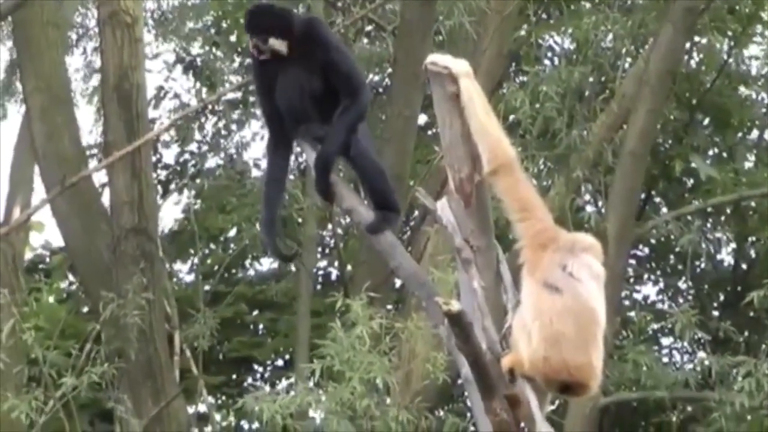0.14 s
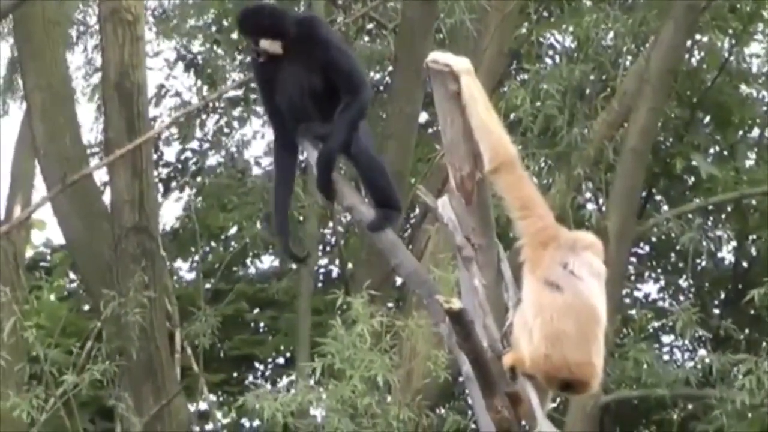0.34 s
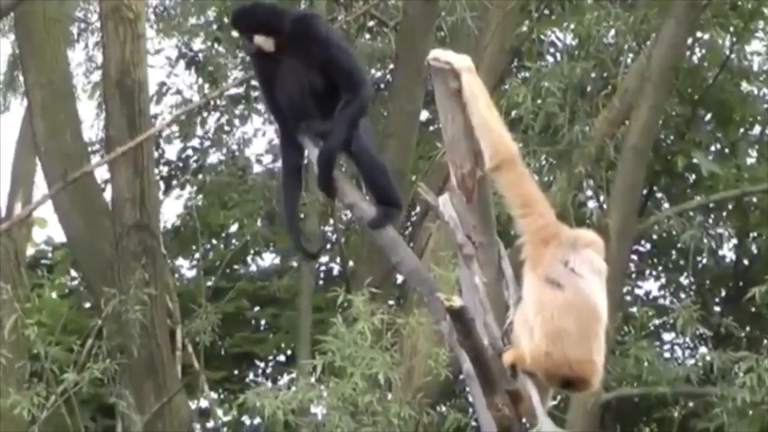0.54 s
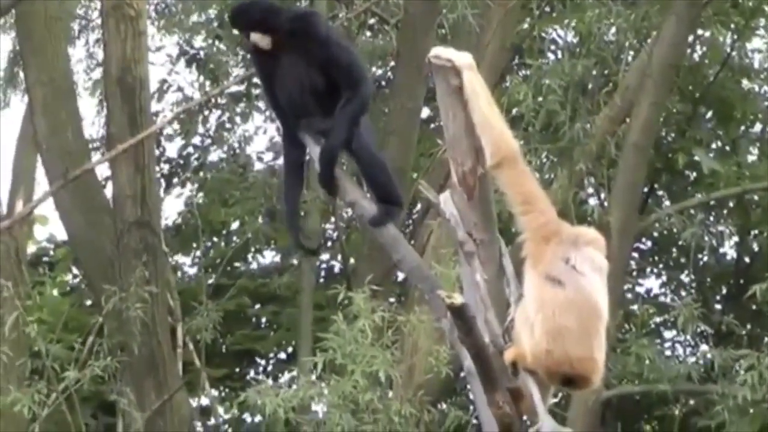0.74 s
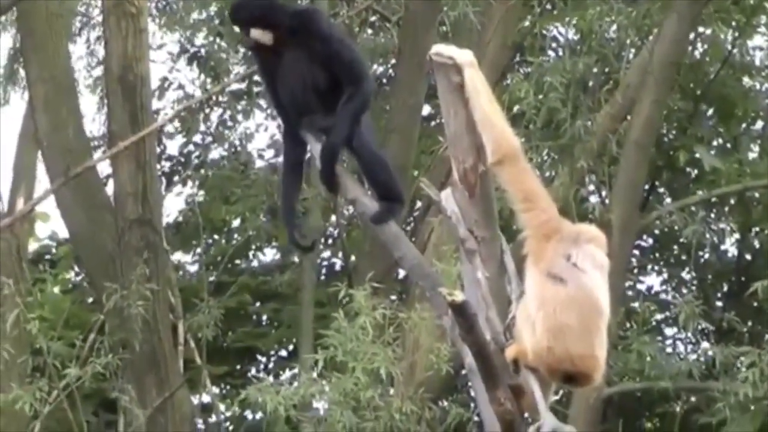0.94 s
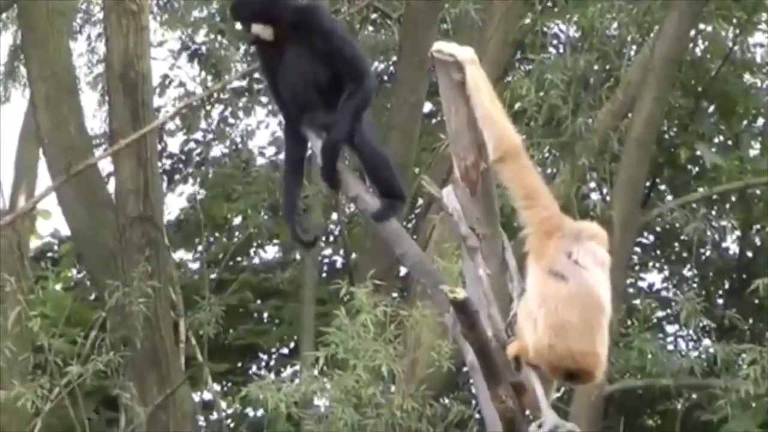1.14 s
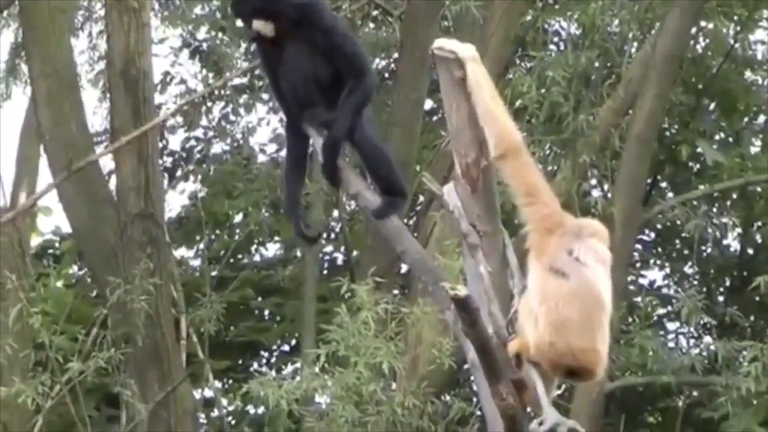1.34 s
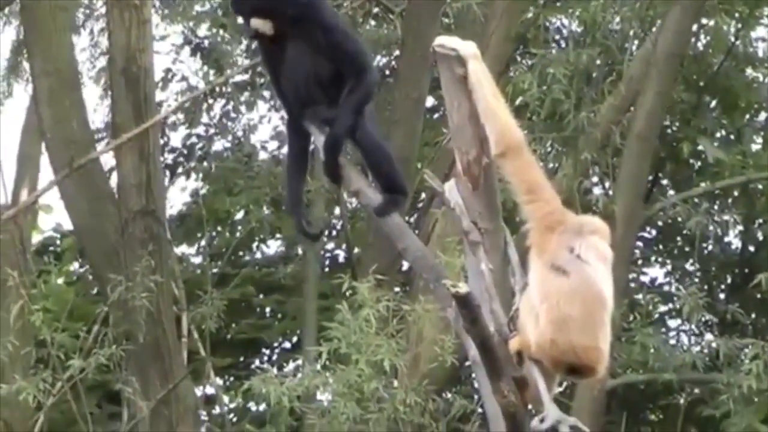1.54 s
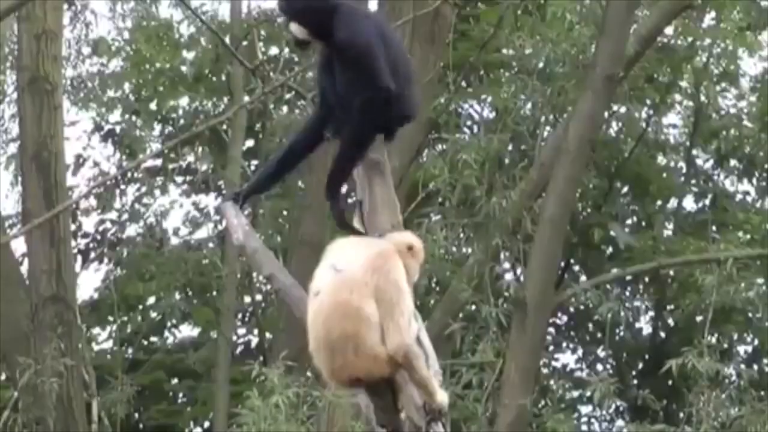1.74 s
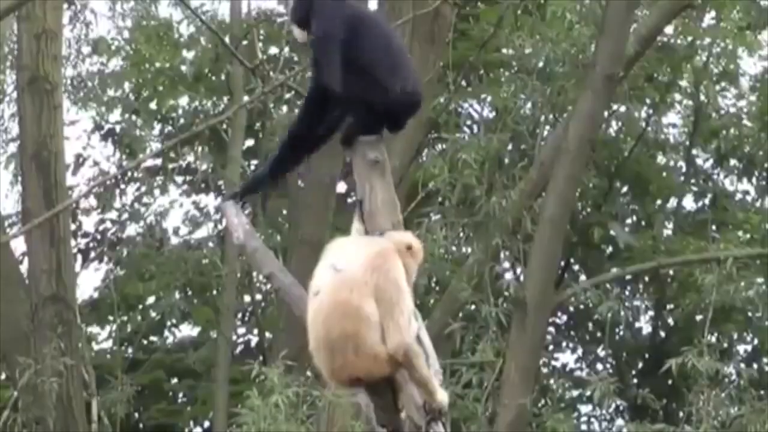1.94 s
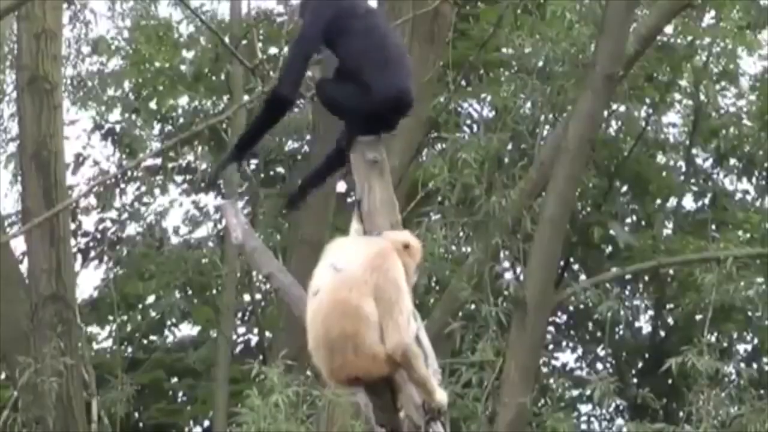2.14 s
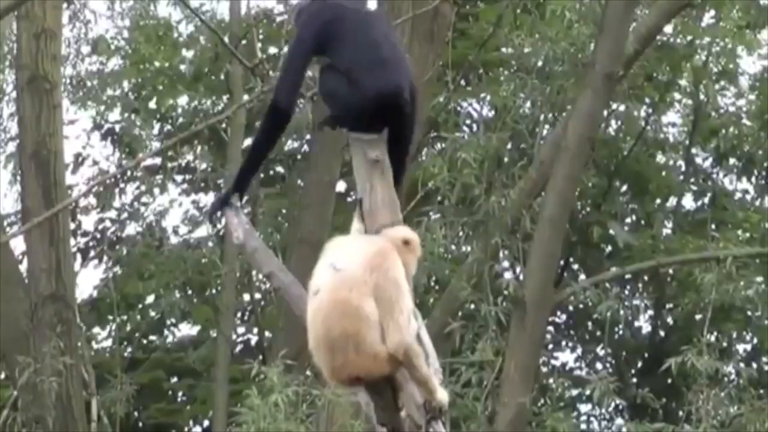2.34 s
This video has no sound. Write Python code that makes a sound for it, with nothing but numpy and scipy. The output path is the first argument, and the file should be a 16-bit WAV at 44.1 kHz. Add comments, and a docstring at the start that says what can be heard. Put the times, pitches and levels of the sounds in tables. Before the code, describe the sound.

A gibbon sings a clear whistle that slides upward and echoes off trees, then gives a short, softer hoot. Between them a small bird trills faintly. Leaves rustle over a low hum and distant rumble in the outdoor enclosure.

```python
"""In an outdoor enclosure, a gibbon on a dead tree sings a rising whistle, later a short hoot, and
two faint peeps; an earlier note still rings. Each note is one gliding pitch with overtones (multiples
of that pitch) shaped by the throat, and it echoes off trunks and walls. A small bird trills high up,
twigs snap and a motor hums. Behind them are faint tones, a bump of wind, and leaves rustling over
a distant rumble, all made from filtered noise."""
import sys
import numpy as np
from scipy import signal
from scipy.fft import rfft, irfft
from scipy.io import wavfile
from scipy.ndimage import uniform_filter1d

SR = 44100
rng = np.random.default_rng(int(sys.argv[2]) if len(sys.argv) > 2 else 0)


def inscribe(sig):
    """Save sig as 16-bit PCM at rate SR to the path in sys.argv[1].

    A 1-D sig is mono; a 2-D sig holds one channel per row.
    Samples are clipped to [-1, 1] before scaling.
    """
    pcm = np.round(np.clip(np.atleast_2d(sig).T, -1, 1) * 32767)
    wavfile.write(sys.argv[1], SR, pcm.astype(np.int16))


N = 110250

# one table per gibbon note: (time [s], pitch [Hz], base tone [dB], 2nd multiple [dB],
# 3rd and 4th multiples before the throat shapes them [dB])
GIBBON_NOTES = [
    [(-.34, 1473, -70, -75, -80), (-.30, 1474, -56, -55, -59), (-.075, 1497, -23.5, -68, -62),
     (-.06, 1632, -33.5, -72, -73), (-.02, 1676, -32.5, -82, -81), (-.005, 1710, -42, -79, -87)],
    [(.215, 1194, -56, -78, -80), (.228, 1223, -34, -40.5, -78), (.24, 1236, -27.5, -31.5, -54),
     (.253, 1278, -30.5, -40, -48), (.265, 1305, -36, -52, -52), (.29, 1314, -47.5, -39, -52),
     (.312, 1331, -36, -38, -45.5), (.35, 1320, -39.5, -44, -41.5), (.378, 1320, -35, -39, -43.5),
     (.405, 1330, -32.5, -35, -44), (.44, 1348, -32.5, -35, -46.5), (.468, 1359, -32, -39.5, -50.5),
     (.49, 1374, -25, -42.5, -36.5), (.505, 1393, -23.5, -42, -48.5), (.517, 1433, -27.5, -40, -46.5),
     (.528, 1420, -25, -43, -51.5), (.548, 1455, -24, -51.5, -63), (.565, 1513, -26.5, -48, -77),
     (.588, 1550, -40.5, -76, -55.5), (.612, 1592, -34, -66, -60.5), (.626, 1590, -45, -71, -74),
     (.634, 1588, -70, -95, -93)],
    [(1.996, 1582, -58, -86, -95), (2.006, 1550, -40.5, -66, -90), (2.024, 1540, -37.5, -56.5, -81),
     (2.044, 1566, -39.5, -65, -85), (2.055, 1583, -40.5, -85, -85), (2.061, 1710, -58, -76, -90),
     (2.069, 1725, -47, -80, -90), (2.078, 1740, -70, -90, -95)],
    [(1.835, 1070, -83, -95, -99), (1.845, 1084, -56, -79, -99), (1.858, 1070, -70, -85, -99),
     (1.868, 1090, -85, -95, -99)],
    [(.152, 1040, -77, -95, -99), (.162, 1064, -61, -79, -99), (.175, 1075, -61, -80, -99),
     (.185, 1090, -75, -95, -99)],
]
# for each note: (left over right [dB])
NOTE_PAN_DB = [13, 0, 4.5, -7, -9]
# for each note: (perch it is sung from [index])
NOTE_PERCH = [0, 0, 1, 1, 0]
# how the throat shapes the 3rd and 4th multiples: (frequency [Hz], gain [dB])
THROAT = [(3800, -27), (3970, -19), (4150, -14), (4600, -5), (5300, -2), (5600, -6.5), (6300, -6)]
# the whistle's top overtones come and go: (multiple, centre [s], half length [s], level [dB])
TOP_OVERTONES = [(5, 0.307, 0.021, -57.5), (5, 0.51, 0.041, -66), (6, 0.268, 0.018, -60.5),
                 (6, .315, .022, -56), (6, 0.423, .045, -57.5), (6, .53, .012, -63), (7, 0.28, .022, -62),
                 (7, 0.35, 0.025, -58.5), (7, .43, 0.028, -60), (8, 0.44, 0.033, -67)]
# echoes off nearby surfaces, one table per perch: (delay [s], base tone gain [dB], overtone gain [dB],
# base tone left over right [dB], base tone's extra delay on the right [ms])
NEAR_ECHOES = [
    [(.023, -10.5, -20.5, 3, -.2), (0.051, -22, -15, -2, 0.32), (.088, -16.5, -21, 4.5, .2),
     (0.139, -38, -23.5, -17, -.2), (.2, -29.5, -27, 12, 0.12)],
    [(.048, -13, 0, 0, .1), (.075, -26, -9, 2, -.1), (.1, -22, -17, 7, .1), (.16, -23, -24, 1, .1)],
]
# for each perch: (gain of the sound sent into the trees [dB])
PERCH_SCATTER_DB = [0.5, 1.5]
# bird phrases: (start [s], length [s], starting pitch [Hz], target pitch [Hz], level [dB])
BIRD_TRILLS = [(1.073, 0.15, 6970, 8400, -58.5), (1.24, 0.14, 7970, 8120, -56.5),
               (1.377, 0.11, 8320, 8240, -57)]
# snaps and knocks among the branches: (time [s], pitch [Hz], level [dB])
TWIG_SNAPS = [(.16, 483, -54), (0.206, 5640, -58), (1.1, 1960, -55.5), (1.914, 2258, -55.5),
              (2.298, 4600, -57), (2.335, 4900, -58), (2.475, 12000, -59)]
# the motor's tones: (multiple of its pitch, level before the drop [dB])
MOTOR_TONES = [(1, -56.5), (3, -61.5), (4, -63), (5, -74.5), (6, -71)]
# faint wavering tones: (pitch [Hz], band width [Hz], level [dB])
FAR_TONES = [(426, 37, -68.5), (553, 11, -68), (1956, 55, -69.5)]
# wind on the microphone: (centre [s], half length [s], level [dB])
WIND_GUSTS = [(0.44, 0.16, -59.5)]
# rumble and leaves: (frequency [Hz], level per hertz [dB], stereo width [dB], left over right [dB])
BACKGROUND_SPECTRUM = [(22, -107, 8, 3), (46.3, -83.5, -6, 3), (100, -87, -21, 5.5), (151, -85, -15, 3.5),
                       (254, -83, -13, 2.5), (460, -82, -18.5, 1), (703, -87.5, -12, 1), (938, -97, -2, 1),
                       (1580, -94.5, -5, -2), (2180, -91.5, -7, -0.5), (2690, -94, -7.5, 0),
                       (3700, -101.5, -4.5, -2), (4700, -94.5, -17, 1), (5490, -93.5, -37, -7),
                       (6390, -98.5, -33, 9.5), (6320, -102, -16, 3), (8930, -103, -33, -10.5),
                       (9600, -99, -46, 14.5), (10400, -102, -40, -14), (11600, -104, -33, 4),
                       (14700, -106, -24, -2)]

MOTOR_HZ, MOTOR_DROP_S = 70.15, 1.77


def gibbon_note(rows, t):
    """One gliding whistle, returned as its base tone and its overtones, which flutter in the throat."""
    flutter_db, flutter_hz = 2.5, 40
    rows = np.array(rows, float)
    on = (t > rows[0, 0]) & (t < rows[-1, 0])
    hz, base_db, second_db, upper_db = (np.interp(t[on], rows[:, 0], col) for col in rows[:, 1:].T)
    waver = 1 + .001 * walk(flutter_hz, len(hz))
    phase = 2 * np.pi * np.cumsum(hz * waver) / SR
    out = np.zeros((2, len(t)))
    out[0, on] = undb(base_db) * np.sin(phase)
    out[1, on] = undb(second_db) * np.sin(2 * phase)
    for k in (3, 4):
        throat_db = np.interp(k * hz, *np.array(THROAT).T)
        flutter = flutter_db * walk(1.47 * flutter_hz, len(hz))
        out[1, on] += undb(upper_db + throat_db + flutter) * np.sin(k * phase)
    for k, centre, half_length, db in TOP_OVERTONES:
        swell = np.exp(-((t[on] - centre) / half_length) ** 2)
        out[1, on] += undb(db + flutter_db * walk(flutter_hz, len(hz))) * swell * np.sin(k * phase)
    return np.sqrt(2) * out


def gibbon():
    """Each note arrives directly, bounced off nearby surfaces, and scattered through the trees."""
    lead_s = .4  # start early so that the earlier note still rings
    t = np.arange(N + int(lead_s * SR)) / SR - lead_s
    notes = [gibbon_note(rows, t) for rows in GIBBON_NOTES]
    base, overtones = sum(undb(PERCH_SCATTER_DB[perch]) * note for note, perch in zip(notes, NOTE_PERCH))
    out = undb(-12.5) * tree_scatter(base, fade_s=.74, width_db=-8.5)
    out += undb(-12) * tree_scatter(overtones, fade_s=.31, width_db=-12)
    for (base, overtones), note_pan_db, perch in zip(notes, NOTE_PAN_DB, NOTE_PERCH):
        out += pan(base + overtones, note_pan_db)
        for delay, base_db, overtone_db, pan_db, lag_ms in NEAR_ECHOES[perch]:
            base_echo = np.array([late(base, delay), late(base, delay + lag_ms / 1000)])
            out += pan(undb(base_db) * base_echo, pan_db) + undb(overtone_db) * late(overtones, delay)
    return out[:, -N:]


def tree_scatter(x, fade_s, width_db):
    """Many tiny echoes off the trees build up and fade; the farthest linger faintly."""
    t = np.arange(int(1.3 * SR)) / SR
    build_up = 1 - np.exp(-t / .023)
    near, far = undb(-60 * t / fade_s), undb(-16 - 60 * t / (2.6 * fade_s))
    shape = build_up * (near + far)
    mid, side = rng.standard_normal((2, len(t))) * shape / np.sqrt(np.sum(shape ** 2))
    side *= undb(width_db)  # mid is what both ears share, side is how they differ
    return signal.fftconvolve(x[None], np.array([mid + side, mid - side]), axes=1)[:, :len(x)]


def bird(t):
    """Each trill slides toward a target pitch and sags; fast, uneven dips in pitch make it raspy."""
    dips_per_s, dip_depth_hz, sag_hz_per_s, throb_hz = 165, 754, 2800, 35
    out = np.zeros(N)
    for start, length, start_hz, target_hz, db in BIRD_TRILLS:
        age = np.clip(t - start, 0, length)
        dip = np.sin(np.pi * np.cumsum(dips_per_s * (1 + .31 * walk(69, N))) / SR) ** 4
        slide_hz = target_hz - (target_hz - start_hz) * np.exp(-age / .034)
        hz = slide_hz - sag_hz_per_s * age - dip_depth_hz * dip
        throb_db = 3 * np.cos(2 * np.pi * throb_hz * age) + 2.6 * walk(90, N)
        swell = np.sin(np.pi * (age / length) ** .52).clip(0) ** .57
        out += swell * undb(db + throb_db - 4.5 * dip) * np.sin(2 * np.pi * np.cumsum(hz) / SR)
    return pan(out, db=4) + undb(-5) * tree_scatter(out, fade_s=.5, width_db=-6.5)


def twigs(t):
    """Each snap is a brief puff of noise around its own pitch; low ones last longer."""
    out = np.zeros(N)
    for centre, hz, db in TWIG_SNAPS:
        ring = signal.iirpeak(hz, Q=4, fs=SR)
        noise = signal.lfilter(*ring, signal.lfilter(*ring, rng.standard_normal(N)))
        half_length = .0036 + 11 / hz
        out += undb(db) * np.exp(-((t - centre) / half_length) ** 2) * noise / noise.std()
    return out


def motor(t):
    """A motor hums on one steady pitch and steps down in level once."""
    drop_db = -5 * np.clip((t - MOTOR_DROP_S) / .027, 0, 1)
    out = np.zeros(N)
    for k, db in MOTOR_TONES:
        level = undb(db + .81 * np.sqrt(k) * walk(8, N) + drop_db / np.sqrt(k))
        out += level * np.sin(2 * np.pi * (k * MOTOR_HZ * t + rng.random()))
    return pan(np.sqrt(2) * out, db=2)


def far_tones(t):
    """Unsteady tones far away, each a narrow band of noise, come in as the hum drops."""
    out = np.zeros(N)
    for hz, width_hz, db in FAR_TONES:
        tone = signal.lfilter(*signal.iirpeak(hz, hz / width_hz, fs=SR), rng.standard_normal(N))
        out += undb(db + 2 * walk(4.8, N)) * tone / tone.std()
    return out * np.clip((t - MOTOR_DROP_S) / .1, 0, 1)


def wind(t):
    """A soft, low bump of wind, partly shared by left and right."""
    gust_hz = 43.7
    low_band = signal.butter(2, [gust_hz / 1.2, gust_hz * 1.65], "band", fs=SR, output="sos")
    noise = signal.sosfilt(low_band, rng.standard_normal((2, N)) + 1.1 * rng.standard_normal(N))
    swell = sum(undb(db) * np.exp(-((t - centre) / half) ** 2) for centre, half, db in WIND_GUSTS)
    return swell * noise / noise.std()


def leaves_and_rumble(t):
    """Rustling leaves over a distant rumble: bands of noise that swell together and flicker alone."""
    hz = np.fft.rfftfreq(N, 1 / SR) + 1
    table_hz, *columns = np.array(BACKGROUND_SPECTRUM).T
    db, width_db, pan_db = (np.interp(np.log(hz), np.log(table_hz), col) for col in columns)
    centred_above_hz = 4300
    width_db = np.where(hz > centred_above_hz, -45, width_db)
    pan_db *= hz < centred_above_hz
    mid, side = rfft(rng.standard_normal((2, N))) * undb(db) * np.sqrt(SR / 2)
    side *= undb(width_db)
    spectrum = pan(np.array([mid + side, mid - side]), pan_db)
    swell_db = walk(1.5, N)
    swell_db -= swell_db.mean()
    stir_db = 3.5 * np.clip((t - 2.2) / .33, 0, 1)  # the middle bands grow near the end
    out = np.zeros((2, N))
    for band in range(60):  # six bands per octave, from 20 Hz up
        offset = np.clip(6 * np.log2(hz / 20) - band, -1, 1)
        noise = irfft(spectrum * np.cos(np.pi / 2 * offset) ** 2, N)
        flicker_db = walk(9.24, N)
        rustle_db = 1.5 * walk(120, N) * (band > 38)  # only the treble is grainy
        out += noise * undb(swell_db + flicker_db + rustle_db + stir_db * (24 < band < 45))
    return out


def undb(db):
    """Turn decibels into a number to multiply a sound by."""
    return 10 ** (np.asarray(db) / 20)


def pan(x, db):
    """Two channels, db louder on the left."""
    return x * undb(np.array([db, -db]) / 2).reshape(2, -1)


def walk(rate, size):
    """A smooth random wobble of roughly plus or minus 1, with rate new values a second."""
    hold = int(SR / rate)
    steps = np.repeat(rng.standard_normal(size // hold + 1), hold)
    return 1.08 * uniform_filter1d(uniform_filter1d(steps, hold), hold)[:size]


def late(x, seconds):
    """The same sound, delayed."""
    gap = int(seconds * SR)
    return np.concatenate([np.zeros(gap), x[:len(x) - gap]])


def scene():
    """All the sources added together in stereo."""
    t = np.arange(N) / SR
    return gibbon() + bird(t) + motor(t) + far_tones(t) + leaves_and_rumble(t) + wind(t) + twigs(t)


def record(dry):
    """The highest treble is cut off steeply."""
    top_hz = 14930
    return signal.sosfilt(signal.ellip(12, .2, 80, top_hz, fs=SR, output="sos"), dry)


dry = scene()
out = record(dry)
inscribe(out)
```